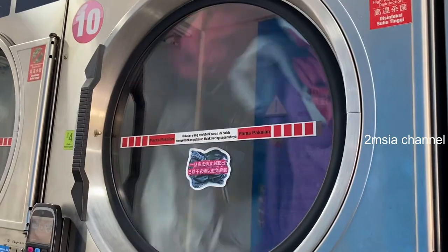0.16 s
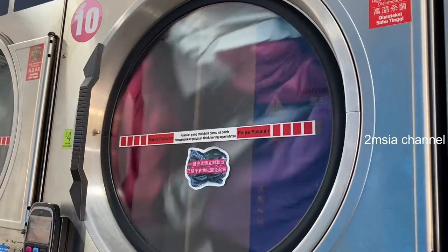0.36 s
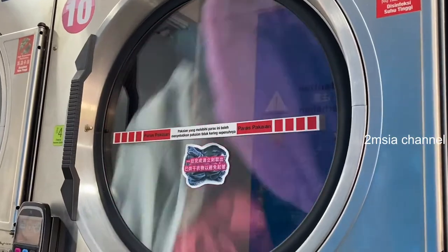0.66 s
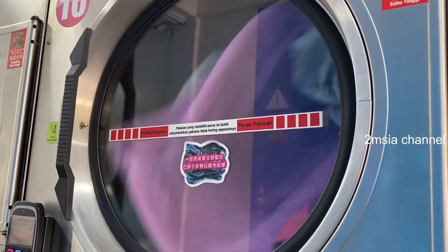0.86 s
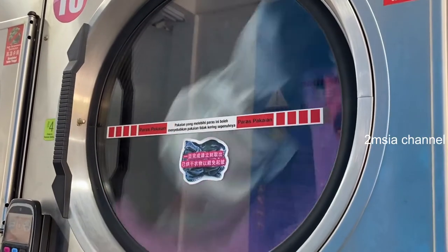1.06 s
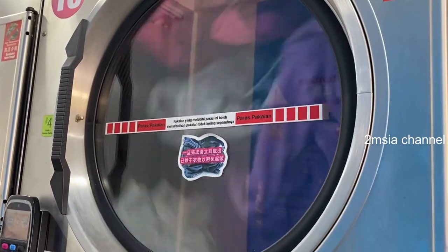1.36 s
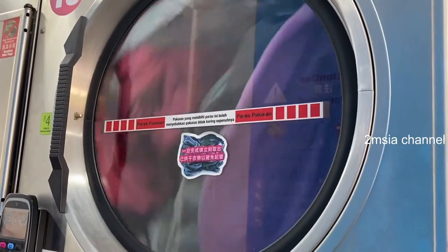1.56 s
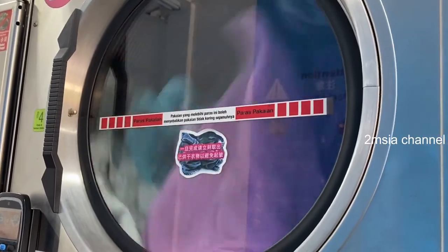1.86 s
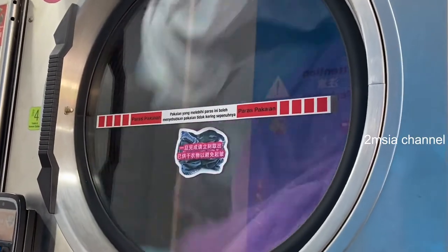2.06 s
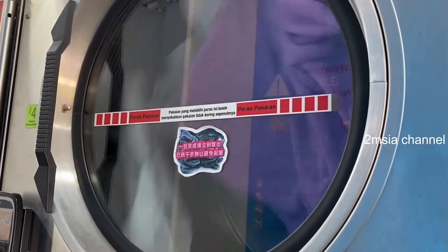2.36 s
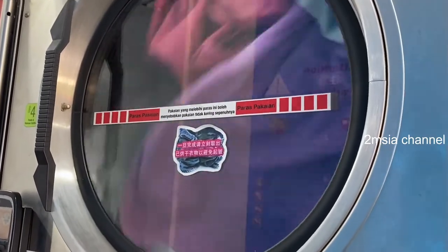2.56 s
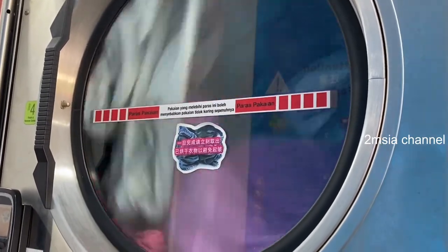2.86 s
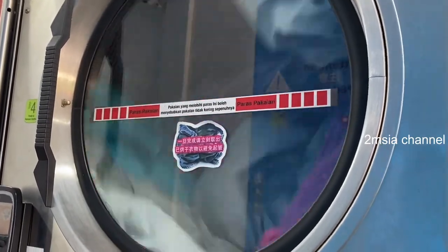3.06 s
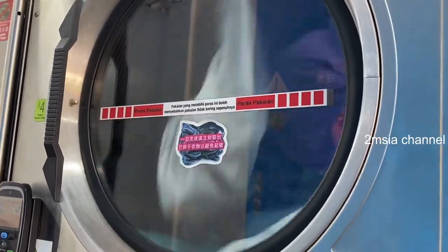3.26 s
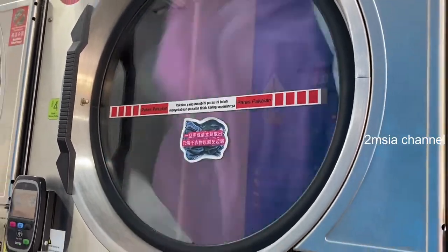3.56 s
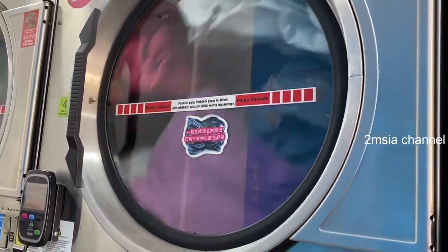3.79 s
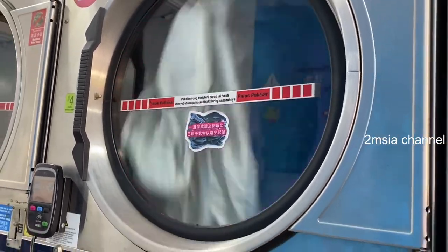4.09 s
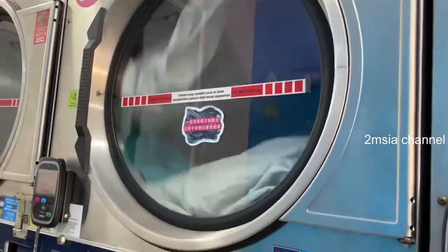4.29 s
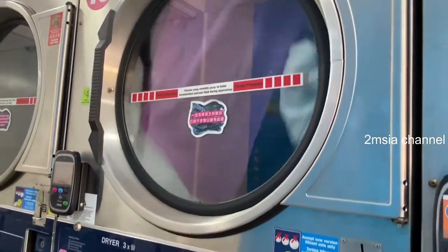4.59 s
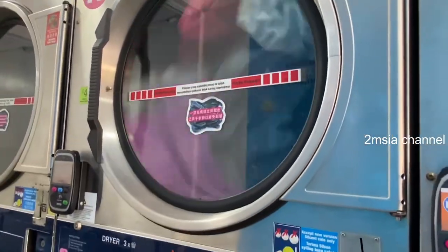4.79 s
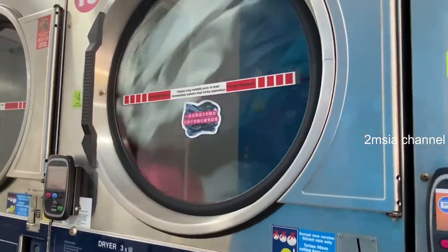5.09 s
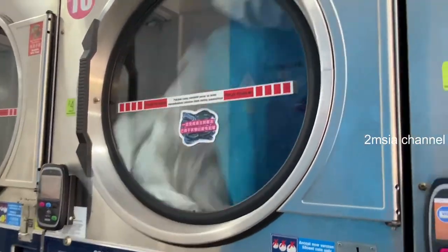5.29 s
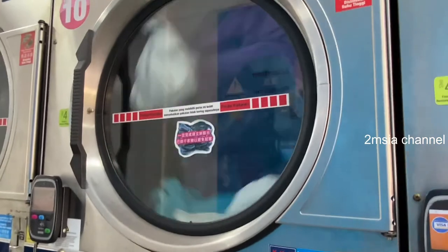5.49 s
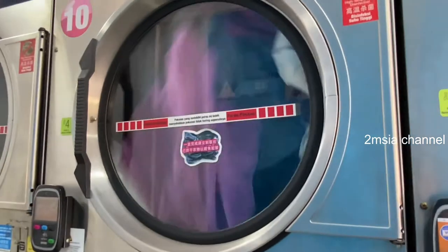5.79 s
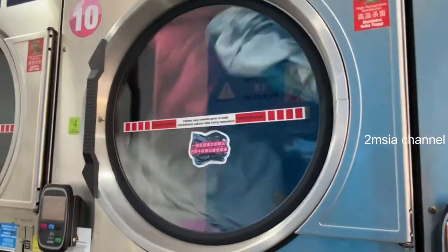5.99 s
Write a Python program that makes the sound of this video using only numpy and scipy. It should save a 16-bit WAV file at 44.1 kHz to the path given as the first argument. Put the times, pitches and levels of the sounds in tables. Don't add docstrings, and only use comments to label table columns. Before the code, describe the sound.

Close stereo pickup of a large tumble dryer in an open laundry room: deep steady hum, motor tone, low blower rumble and airy rush. Fabric brushes the drum with irregular small ticks and hiss swells. An engine drones faintly outside; a vehicle rushes past soon after four seconds, and a thin seal squeak comes near the end.

```python
import sys
import numpy as np
from scipy import signal
from scipy.fft import rfft, irfft, next_fast_len
from scipy.io import wavfile

SR = 44100
rng = np.random.default_rng(int(sys.argv[2]) if len(sys.argv) > 2 else 0)


def voltage_ratio(decibels):
    exponent = np.asarray(decibels, float) / 20
    return 10 ** exponent


def log_audio(samples):
    frames = np.atleast_2d(samples).T
    limited = np.clip(frames, -1, 1)
    pcm = np.round(limited * 32767).astype(np.int16)
    wavfile.write(sys.argv[1], SR, pcm)


N = 270774
T = np.arange(N) / SR
PAD = next_fast_len(N, True)


def in_time(rows):
    s, *columns = np.transpose(rows)
    return [np.interp(T, s, c) for c in columns]


def at_hz(points, hz):
    point_hz, value = np.transpose(points)
    return np.interp(np.log(hz), np.log(point_hz), value)


def rms_one(x):
    return x / np.sqrt(np.mean(x ** 2) + 1e-20)


def drift(rate_hz):
    r = np.exp(-80 * np.pi * rate_hz / SR)
    coarse = rng.standard_normal(N // 40 + 2002)
    slow = signal.lfilter([1], [1, -2 * r, r * r], coarse)[2000:]
    return np.interp(np.arange(N) / 40, np.arange(len(slow)), rms_one(slow))


def swell(s, length_s):
    return np.exp(-.5 * ((T - s) / length_s) ** 2)


def swells(rows, idle_db):
    return voltage_ratio(idle_db) + sum(voltage_ratio(level_db) * swell(s, length_s) for s, length_s, level_db in rows)


def tone(hz, level_db, wobble):
    phase = 2 * np.pi * np.cumsum(hz + 0 * T) / SR
    phase = phase + wobble * drift(1.66) + 2 * np.pi * rng.random()
    return np.sqrt(2) * voltage_ratio(level_db) * np.sin(phase)


def resonant_noise(hz, width_hz, size=N):
    r = np.exp(-np.pi * width_hz / SR)
    poles = [1, -2 * r * np.cos(2 * np.pi * hz / SR), r * r]
    return rms_one(signal.lfilter([1, 0, -1], poles, rng.standard_normal(size)))


def coloured(spectrum):
    hz = np.maximum(np.fft.rfftfreq(PAD, 1 / SR), 1)
    return hz, rfft(rng.standard_normal((2, PAD))) * voltage_ratio(at_hz(spectrum, hz))


# f/Hz, left-right likeness [0..1]
FIELD_LIKENESS = [(40, .965), (92, .97), (140, .9), (210, .8), (330, .76), (500, .45), (770, .35),
                  (1170, .2), (1790, .11), (2740, .39)]
# f/Hz, left minus right/dB
PORT_LEAN = [(60, -1.0), (110, -1.0), (200, -1.5), (380, -1.0), (700, -0.5), (1290, -0.5), (2380, 0.5),
             (4400, 0.0), (8120, -0.5), (15000, 0.0)]


def patchy_noise(spectrum, patchy_db, side_db=None):
    hz, bins = coloured(spectrum)
    octave = np.log2(hz)
    low, high = np.log2(spectrum[0][0]), np.log2(spectrum[-1][0])
    out, together = 0, drift(11.0)
    for centre in np.arange(low, high + .5, .5):
        share = np.cos(np.pi * np.clip(octave - centre, -.5, .5)) ** 2
        flicker = voltage_ratio(patchy_db * (0.36 * together + 0.88 * drift(21.0)))
        mid, side = irfft(bins * share, PAD)[:, :N] * flicker
        alike = 0
        if side_db is None:
            alike = np.clip(at_hz(FIELD_LIKENESS, 2 ** centre), 0, .998)
        lean = voltage_ratio(at_hz(PORT_LEAN, 2 ** centre) / 2)
        mid_side = np.array([mid * np.sqrt(1 + alike), side * np.sqrt(1 - alike)])
        to_ports = np.array([[lean, 1 / lean], [lean, -1 / lean]])
        out = out + mid_side[:, None] * to_ports[:, :, None]
    if side_db is not None:
        alike = 2 / (1 + voltage_ratio(2 * side_db)) - 1
        out = out[0] * np.sqrt(1 + alike), out[1] * np.sqrt(1 - alike)
    return rms_one(out[0] + out[1])


# t/s, level/dB
HUM_LEVEL = [(0, -25.5), (.3, -23), (3.0, -23.5), (4.6, -24), (4.93, -25.5), (5.3, -23), (5.68, -25.5),
             (5.92, -29), (6.08, -37)]
# multiple of mains hum, level/dB
HUM_HARMONICS = [(2, -48.5), (3, -46), (4, -47)]
# f/Hz, width/Hz, level/dB
CASING_RINGS = [(294.2, 1.04, -48.5), (328.7, 7.7, -51), (358, 20, -48), (549, 28, -59.5)]
MAINS_HZ, SHAFT_HZ, DRUM_HZ = 99.89, 123.49, 69.9


def motor():
    hum_db, = in_time(HUM_LEVEL)
    out = tone(MAINS_HZ, hum_db + 0.8 * drift(2.5), wobble=.08)
    out += tone(SHAFT_HZ, -32 + 0.4 * drift(2.5), wobble=.25)
    out += belt()
    out += tone(DRUM_HZ, -38.5 + 1.2 * drift(2.5), wobble=.5)
    for multiple, level_db in HUM_HARMONICS:
        out += tone(multiple * MAINS_HZ, level_db + 2.0 * drift(3.0), wobble=0.27)
    for hz, width_hz, level_db in CASING_RINGS:
        out += voltage_ratio(level_db) * resonant_noise(hz, width_hz)
    return out * voltage_ratio([[-.5], [.5]])


# start/s, end/s, start level/dB, end level/dB, unsteadiness/dB
BELT_RISES = [
    (.5, 2.45, -44.5, -40, 1.8),
    (3.301, 5.35, -53, -51, 3.5),
]
BELT_FROM_HZ, BELT_CLIMB_HZ_PER_S, BELT_FADE_S = 479.3, 5.0, .15


def belt():
    out = np.zeros(N)
    for start, end, start_db, end_db, sway_db in BELT_RISES:
        level_db = np.interp(T, [start, end], [start_db, end_db]) + sway_db * drift(2.5)
        on = np.clip(np.minimum(T - start, end - T) / BELT_FADE_S, 0, 1)
        hz = BELT_FROM_HZ + BELT_CLIMB_HZ_PER_S * (T - start)
        out += on * tone(hz, level_db, wobble=1.0)
    return out


# f/Hz, level/dB per Hz
RUMBLE_COLOUR = [(18, -40), (26, -29), (33, -12), (41, -9), (50, -1.5), (58, 2), (75, -9.5), (90, 4),
                 (110, -4.5), (135, -3), (165, -4), (210, -11.5), (300, -13)]
# f/Hz, level/dB per Hz
RUSH_COLOUR = [(150, -28), (200, -15), (250, -9.5), (320, -10), (420, -15.5), (550, -12), (750, -14.5),
               (1000, -18), (1400, -21.5), (1900, -24), (2300, -31), (2900, -39.5)]
RUMBLE_DB, RUSH_DB = -30.5, -34


def blower():
    rumble = voltage_ratio(RUMBLE_DB) * patchy_noise(RUMBLE_COLOUR, patchy_db=1.46)
    rush = voltage_ratio(RUSH_DB) * patchy_noise(RUSH_COLOUR, patchy_db=0.84)
    return rumble + rush


# t/s, level/dB
DRUM_LOAD = [(0, 0), (1.2, 0.2), (2.38, 0.4), (2.52, 2), (3.4, 1), (3.7, 1.4), (4.3, 3), (5.0, .8),
             (6.14, 0.5)]
# t/s, length/s, brushing swell/dB, hiss swell/dB
LOAD_SWEEPS = [(.09, .05, 1, -0.5), (0.843, 0.028, .5, 3.5), (1.2, .07, 0, 1.5), (1.48, 0.035, 0.5, 2.5),
               (1.78, .04, -0.5, 1.5), (2.048, .05, 0.5, 2), (3.403, .06, 1.5, .3), (3.77, 0.046, 1.5, -1),
               (5.18, 0.067, 1.5, 0), (5.575, 0.038, -0.5, 2), (5.9, .08, -0.5, 0.5), (6.07, 0.037, 3, 1)]
BRUSHING, HISSING = 2, 3


def tumble(column, load_share):
    sweeps_db = sum(row[column] * swell(row[0], row[1]) for row in LOAD_SWEEPS)
    return load_share * in_time(DRUM_LOAD)[0] + sweeps_db


# f/Hz, level/dB per Hz
BRUSH_COLOUR = [(1500, -20), (2000, -7), (2150, -2), (2600, 1.5), (2900, -2.5), (3300, -3), (4200, -4),
                (5200, -8.5), (6000, -7.5), (6600, -10), (7200, -19), (9000, -29)]
# t/s, side minus mid/dB
CLOTH_WIDTH = [(0, -4), (.4, -4), (.9, -12), (1.5, -10), (2.0, -15), (2.4, -16), (3.1, -15), (3.4, -11),
               (3.65, -5), (4.1, -2), (5.0, 3), (6.14, 2.5)]
CLOTH_DB = -53.5


def cloth():
    side_db, = in_time(CLOTH_WIDTH)
    brush_db = CLOTH_DB + tumble(BRUSHING, load_share=0.75)
    return voltage_ratio(brush_db + 7.0) * patchy_noise(BRUSH_COLOUR, 0.39, side_db)


# t/s, peak level/dB, f/Hz, width/Hz, t60/s
DRUM_TICKS = [(.06, -43, 3740, 400, .2), (.525, -52, 5800, 500, .05), (1.455, -40.5, 3300, 900, 0.11),
              (1.455, -47, 6200, 1500, 0.11), (1.575, -41, 5200, 1500, 0.065), (2.238, -44, 6100, 500, .04),
              (2.553, -42, 5800, 800, 0.067), (2.68, -39, 3370, 120, 0.062), (3.085, -45, 5400, 900, 0.11),
              (4.1, -44, 4200, 1200, .1), (4.46, -45, 3280, 400, 0.2), (4.6, -44, 3000, 1200, .12),
              (4.76, -41, 2600, 1200, .1), (4.92, -56, 5800, 400, .06), (5.18, -41, 3950, 800, 0.07),
              (5.17, -44, 3970, 200, .11), ]
TICK_RISE_S = 0.00092


def ticks():
    out = np.zeros(N)
    for s, peak_db, hz, width_hz, t60_s in DRUM_TICKS:
        span = slice(int(s * SR), int(s * SR) + SR)
        t = T[span] - s
        rise = 1 - np.exp(-np.maximum(t, 0) / TICK_RISE_S)
        ring = resonant_noise(hz, width_hz, size=SR)[:len(t)]
        out[span] += voltage_ratio(peak_db - 60 * t / t60_s) * rise * ring
    return signal.sosfilt(signal.butter(6, 7500, fs=SR, output="sos"), out)


# f/Hz, level/dB per Hz
LEAK_COLOUR = [(4000, -20), (6000, -3), (7500, 0), (9000, -2), (11000, -4.5), (13000, -6.5), (15500, -9.5)]
HISS_DB, HISS_TOP_DB = -63, -6
IN_STEP_HZ, TURN_HZ = 11160, 4220


def hiss():
    hz, (bins, stray) = coloured(LEAK_COLOUR)
    steep = np.clip(hz / LEAK_COLOUR[0][0], 0, 1) ** 4
    turn = np.exp(1j * np.pi * (hz - IN_STEP_HZ) / TURN_HZ)
    stray = voltage_ratio(-18) * stray
    ports = steep * np.array([bins / turn + stray, bins * turn + 1j * stray])
    level_db = HISS_DB + tumble(HISSING, load_share=1)
    top_db = HISS_TOP_DB + .8 * drift(10.0) - 2.5 * swell(CLOSEST_S, .25)
    top = np.clip((hz - 12000) / 1500, 0, 1)
    body = irfft(ports * (1 - top), PAD)[:, :N]
    both = body + voltage_ratio(top_db + 6.5) * irfft(ports * top, PAD)[:, :N]
    return voltage_ratio(level_db + 9.0 + 0.88 * drift(25.0)) * rms_one(both)


# t/s, f/Hz
FIRING_RATE = [(0, 78.2), (3.0, 80.83), (4.0, 81.74), (5.0, 82.57), (6.14, 83.6)]
# t/s, level/dB
FIRING_EFFORT = [(0, -41), (1.3, -26), (1.7, -43), (2.4, -30), (3.0, -33.5), (3.3, -26.5), (3.65, -26.5),
                 (4.0, -30.5), (4.3, -31.5), (4.95, -29.5), (5.15, -42.5), (5.5, -40), (6.14, -37)]
# t/s, f/Hz
EXHAUST_PITCH = [(0, 185), (.8, 186), (1.3, 189), (2.3, 189.5), (2.8, 191.5), (3.7, 189.5), (4.4, 195.5),
                 (6.14, 196.5)]
# t/s, length/s, level/dB
EXHAUST_THROBS = [(.24, 0.043, -34.5), (.48, .07, -36.5), (.77, .05, -35), (.93, 0.056, -38),
                  (1.25, 0.14, -35), (1.52, 0.056, -33), (1.72, 0.057, -38), (1.98, .09, -35),
                  (2.38, 0.072, -31), (2.66, 0.057, -30), (2.96, 0.1, -31.5), (3.27, 0.064, -31),
                  (3.52, 0.11, -35.5), (3.7, .05, -38), (3.9, 0.054, -34.5), (4.17, 0.025, -31),
                  (4.34, 0.046, -35.5), (4.66, 0.083, -32), (5.07, 0.056, -29.5), (5.25, 0.027, -32),
                  (5.52, .04, -37), (5.8, .04, -37), (5.98, 0.051, -35)]
# t/s, length/s, level/dB
GEAR_1_SWELLS = [
    (.4, 0.79, -64.5),
    (3.24, .13, -53),
    (3.679, .1, -60),
    (4.05, .06, -55),
    (4.75, .2, -62),
    (5.15, .12, -62),
    (5.583, 0.11, -55.5),
    (5.92, 0.084, -57),
]
# t/s, length/s, level/dB
GEAR_2_SWELLS = [
    (0, .5, -63),
    (3.75, .25, -62.5),
    (4.5, .12, -63),
    (4.88, 0.12, -58),
    (5.35, .2, -63),
]
GEAR_1_TEETH, GEAR_2_TEETH = 40, 48.16
GEAR_IDLE_DB, DRONE_IDLE_DB = -78, -57


def engine():
    hz, = in_time(FIRING_RATE)
    effort_db, = in_time(FIRING_EFFORT)
    drone_hz, = in_time(EXHAUST_PITCH)
    low = tone(hz, effort_db + 1.0 * drift(3.0), wobble=.12)
    drone = tone(drone_hz, -2.0 + 3.0 * drift(18.0), wobble=2.2)
    low += swells(EXHAUST_THROBS, DRONE_IDLE_DB) * drone
    whine = 0
    for teeth, rows in (GEAR_1_TEETH, GEAR_1_SWELLS), (GEAR_2_TEETH, GEAR_2_SWELLS):
        whine = whine + swells(rows, GEAR_IDLE_DB) * tone(teeth * hz, 2.2 * drift(14.0), wobble=.5)
    return low * voltage_ratio([[-.6], [.6]]) + whine * voltage_ratio([[-3.0], [2.5]])


# f/Hz, level/dB per Hz
TYRE_COLOUR = [(200, -29), (350, 7), (700, 1.5), (1300, -4), (2500, -9.5), (4500, -13), (6500, -16),
               (7200, -21), (9000, -57)]
# f/Hz, level/dB per Hz
BODY_COLOUR = [(200, -30), (300, 2), (420, 2), (700, -3), (1200, -8), (2000, -30)]
IN_SIGHT_S, CLOSEST_S, CLOSEST_DB = 4.03, 4.37, -29.5
PASS_GAP_S = 0.13
WALL_LOSS_DB, STREET_ECHO_DB = 15, -38
ROAR_DB, ROAR_CLOSEST_S, ROAR_GAP_S = -35.5, 4.23, 0.29


def passing_vehicle():
    direct = voltage_ratio(CLOSEST_DB) / np.hypot(1, (T - CLOSEST_S) / PASS_GAP_S)
    hidden = np.clip((IN_SIGHT_S - T) / 0.071 + .5, 0, 1)
    echo = voltage_ratio(STREET_ECHO_DB) * np.clip((T - CLOSEST_S) / .5, 0, 1)
    tyre_gain = voltage_ratio(-WALL_LOSS_DB * hidden) * np.hypot(direct, echo)
    body_gain = voltage_ratio(ROAR_DB) / (1 + ((T - ROAR_CLOSEST_S) / ROAR_GAP_S) ** 2)
    body = body_gain * patchy_noise(BODY_COLOUR, 1.5, side_db=-4.5)
    return tyre_gain * patchy_noise(TYRE_COLOUR, 1.76, side_db=-0.7) + body


# t/s, length/s, level/dB
SEAL_RUBS = [
    (5.88, .03, -61),
    (5.96, .05, -49.5),
    (6.06, .03, -55),
]
SQUEAK_HZ = 1920


def squeak():
    return swells(SEAL_RUBS, -90) * tone(SQUEAK_HZ, 2.0 * drift(20.0), wobble=1.0)


def scene():
    dryer = motor() + blower() + cloth() + ticks() + hiss()
    return dryer + engine() + passing_vehicle() + squeak()


def low_pass(x):
    return signal.sosfilt(signal.butter(12, 16870, fs=SR, output="sos"), x)


# low f/Hz, high f/Hz, least side minus mid/dB
SIDE_BAND_GATES = [(3650, 4900, -13), (4900, 6400, -14.2), (6400, 7500, -7)]
CUTOFF_HZ = 15750


def record(dry):
    hz = np.fft.rfftfreq(N, 1 / SR)
    mid_side = rfft([dry[0] + dry[1], dry[0] - dry[1]])
    mid, side = irfft(mid_side * (hz < CUTOFF_HZ), N) / 2
    bins = rfft(side)
    width_db, = in_time(CLOTH_WIDTH)
    for low_hz, high_hz, least_db in SIDE_BAND_GATES:
        shut = np.clip(least_db - width_db, 0, 1)
        side = side - shut * irfft(bins * ((hz > low_hz) & (hz <= high_hz)), N)
    return low_pass(np.array([mid + side, mid - side]))


dry = scene()
out = record(dry)
log_audio(out)
```